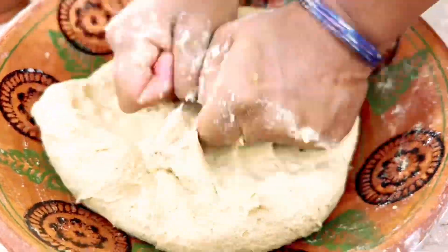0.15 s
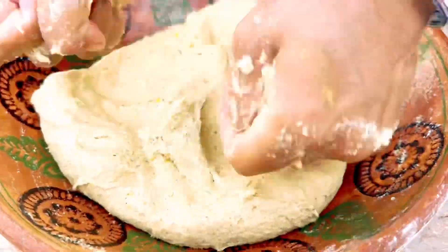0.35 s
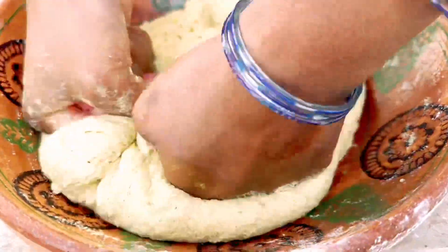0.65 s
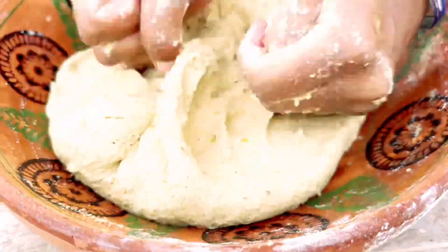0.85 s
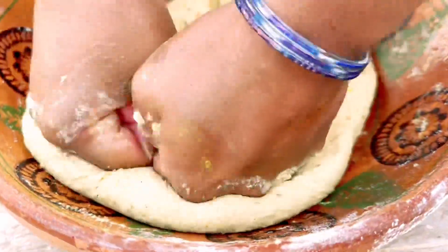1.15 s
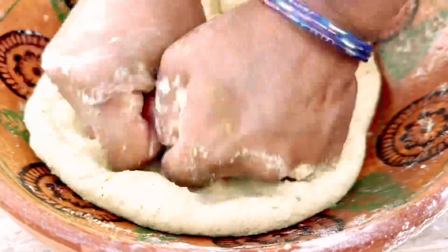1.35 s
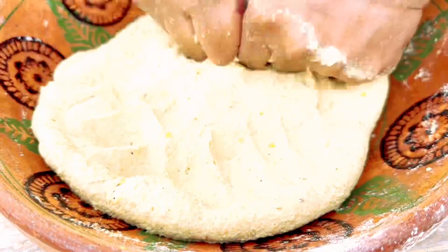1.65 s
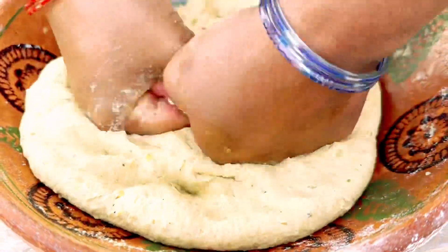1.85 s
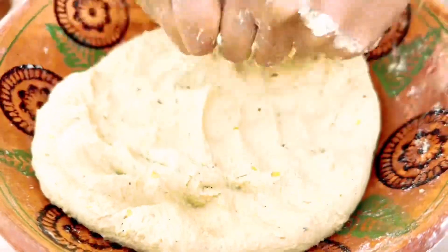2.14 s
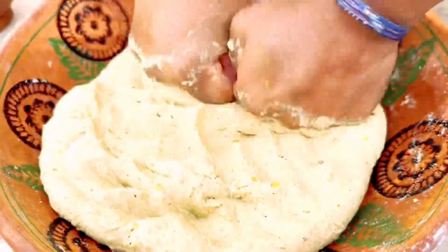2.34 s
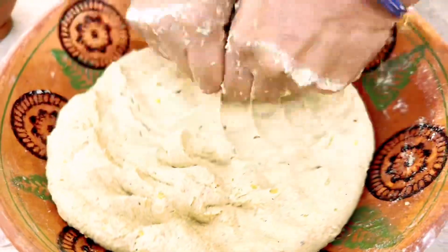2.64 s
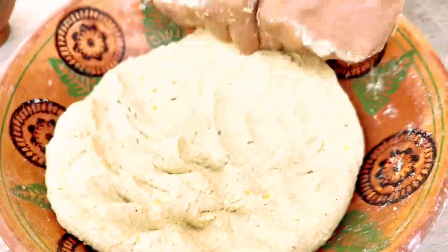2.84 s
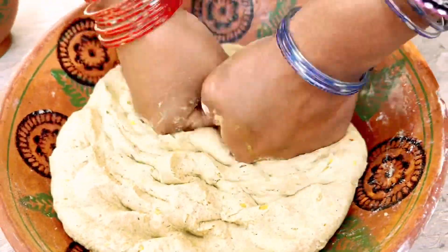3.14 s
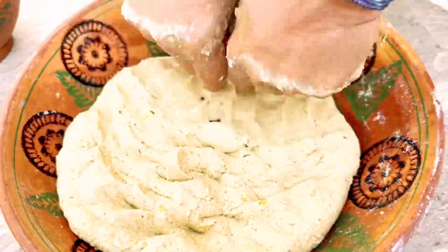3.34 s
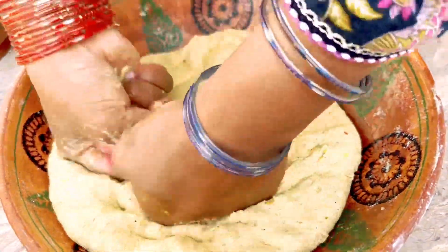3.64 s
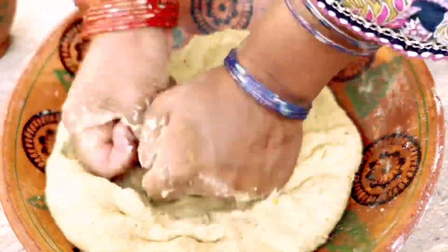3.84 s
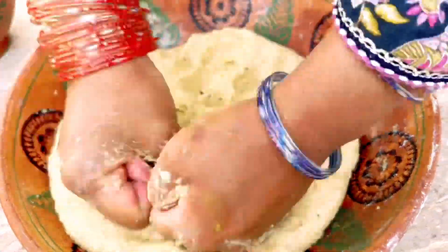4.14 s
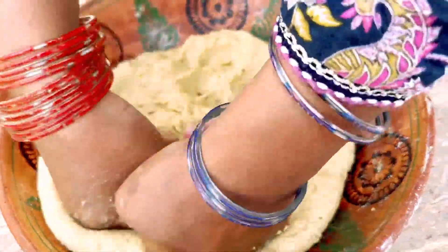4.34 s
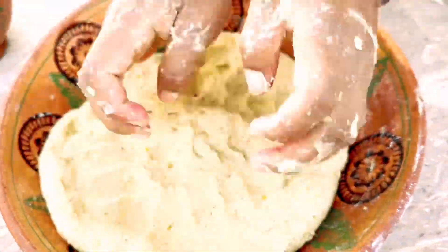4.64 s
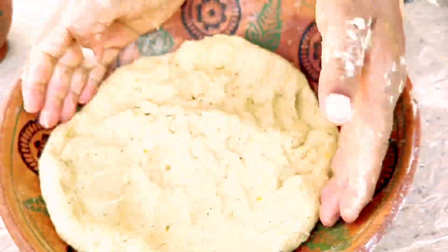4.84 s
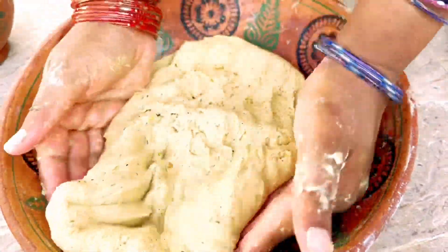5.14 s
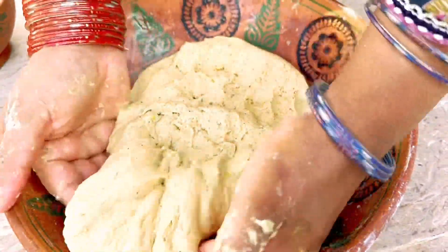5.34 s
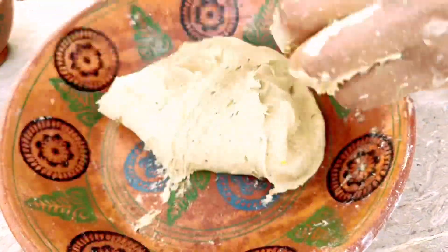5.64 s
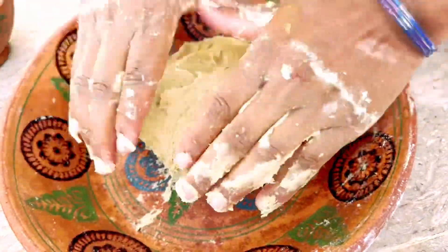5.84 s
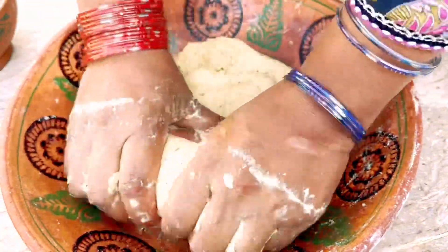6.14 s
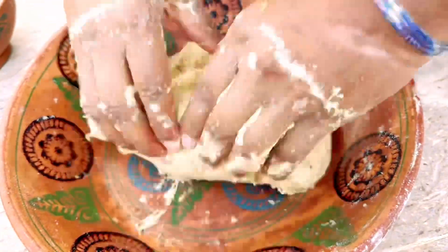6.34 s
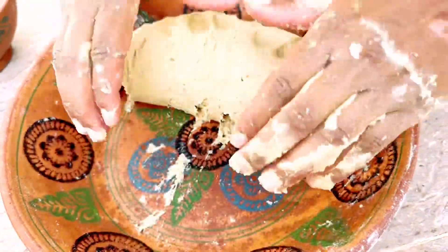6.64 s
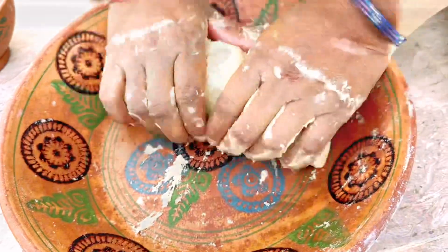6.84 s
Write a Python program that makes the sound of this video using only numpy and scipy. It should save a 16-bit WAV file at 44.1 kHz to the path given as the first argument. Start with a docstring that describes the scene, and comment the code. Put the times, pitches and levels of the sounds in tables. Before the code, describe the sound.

Fists knead stiff dough in a clay bowl, heard close up in an open yard. Glass bangles clink and rattle from the start, high, sharp and irregular, busiest from about 1 to 2.3 seconds. Beneath them, each push gives a soft squelch with sticky ticks and a light rasp, and a short wet pop comes at 1.6 seconds. The bowl rocks and knocks on stone paving with a hard clack at 0.2 and 2 seconds, loudest at 3.2, then more lightly near 3.9 and 4.9. The bangles jingle again around 4 seconds and fall quiet from about 4.6 to 5.7 while dough slides softly over the clay. Near 6 seconds come hollow slaps, light knocks and more clinks, then a scrape, bright clinks at 6.5 and a last knock near 6.9. Soft outdoor air, faint whistles and a far engine's low throb lie behind.

```python
"""Outdoors, on the paving of a yard, two fists knead stiff dough in a clay bowl.
Glass bangles on both wrists collide and ring in their high natural modes. The dough squelches, pops,
ticks and rasps by stick-slip friction, and hard pushes rock the bowl so that it knocks on the stone
and rebounds. Behind are soft open-air noise, faint whistles and a far engine."""
import sys
import numpy as np
from scipy import signal
from scipy.fft import rfft, irfft
from scipy.io import wavfile

SR = 44100
rng = np.random.default_rng(int(sys.argv[2]) if len(sys.argv) > 2 else 0)


def generate_wav(sig):
    """Save sig (samples, or channels by samples) to the path in sys.argv[1] as 16-bit PCM at SR."""
    pcm = np.round(np.clip(np.atleast_2d(sig).T, -1, 1) * 32767).astype(np.int16)
    wavfile.write(sys.argv[1], SR, pcm)


N = 307818

# The bowl strikes the paving. Each row: start in seconds, peak of the main ring in dB, then hollow
# clack, upper ring and treble as offsets from it in dB, and delay of the rebound in seconds.
BOWL_KNOCKS = [(0.2002, -10, -6, -4.5, 1.5, .0078), (2.0285, -9, -7.5, -1.5, 4, .0117),
               (2.254, -24, -9.5, -9, -4, .004), (3.2488, -6, -11, -11, -6.5, .0077),
               (3.9191, -18, -2.5, 3, 5, .004), (4.4348, -38, -14, 4.5, 2, .006),
               (4.8735, -25, -6.5, -3.5, -3.5, .0285), (5.9242, -25, -3, -13, -3, .004),
               (5.9606, -25, -2.5, -6, 12, .017), (6.044, -31.5, -6, -9, 5.5, .005),
               (6.8421, -29, 2, -10, 8, .004), (6.8729, -18.5, -7, -5, 3, 0.016)]
# Natural modes of the clay bowl. Each row: frequency in Hz, level in dB, time to fall 60 dB in seconds.
BOWL_MODES = [(410, -12.5, .1), (596, -24.5, 0.061), (710, -18, 0.022), (975, -1, 0.064),
              (1220, -9.5, 0.019), (1675, -9, 0.13), (1982, -8.5, 0.0056), (2320, -13, 0.05),
              (2516, 1.5, 0.074), (2615, -3, 0.071), (2813, -0.5, 0.025), (3541, -1, 0.055),
              (3800, -14, 0.048), (4900, -23.5, 0.056), (5915, 4.5, 0.035), (6800, -15.5, 0.058),
              (7180, -7, 0.039), (7860, -3, 0.04), (8400, 1.5, 0.023), (9490, 3.5, 0.019),
              (12860, 0, 0.033), (13900, -7, .025), (14450, 6.5, 0.029), (15400, -9, .025)]
# Spectrum of the scraping and the sticky ticks. Each row: frequency in Hz, level in dB.
FRICTION_SPECTRUM = [(300, -23), (1000, -17.5), (1600, -6.5), (2300, -14), (3000, -7.5), (4000, -13),
                     (5500, -12), (7000, -7.5), (9000, 0), (11200, -19), (12500, -4), (13200, -5),
                     (14000, -0.5), (15800, -7.5)]


def amp(db):
    return 10 ** (np.asarray(db) / 20)


def unit_rms(x):
    return x / np.sqrt(np.mean(x ** 2) + 1e-20)


def log_interp(points, hz):
    """Interpolates (Hz, value) points on a log-frequency axis."""
    point_hz, value = np.transpose(points)
    return np.interp(np.log(hz + 1), np.log(point_hz + 1), value)


def freqs(x):
    return np.fft.rfftfreq(x.shape[-1], 1 / SR)


def coloured(x, spectrum):
    """Spectral shaping by (Hz, dB) points, scaled to an rms of 1."""
    return unit_rms(irfft(rfft(x) * amp(log_interp(spectrum, freqs(x))), x.shape[-1]))


def band(x, lo_hz, hi_hz, order=3):
    """Causal Butterworth band-pass."""
    return signal.sosfilt(signal.butter(order, [lo_hz, hi_hz], "band", fs=SR, output="sos"), x)


def wander(rate_hz):
    """Random modulation: low-passed noise with an rms of 1."""
    noise = rng.standard_normal(N)
    return unit_rms(irfft(rfft(noise) * np.exp(-(freqs(noise) / rate_hz) ** 2), N))


def curves(rows):
    """Interpolates each column of a (seconds, ..) table at every sample."""
    times, *columns = np.transpose(rows)
    return [np.interp(np.arange(N) / SR, times, column) for column in columns]


def add(mix, start_s, sound):
    """Superposes a sound on the mix."""
    part = mix[max(round(start_s * SR), 0):][:len(sound)]
    part += sound[:len(part)]


def chatter(t, per_s, settle_s, size):
    """Inelastic impact: a unit impulse, then random rebounds that decay exponentially."""
    hits = size * rng.standard_normal(len(t)) * (rng.random(len(t)) < per_s / SR) * np.exp(-t / settle_s)
    hits[0] = 1
    return hits


def ring(t, hz, db, t60):
    """Free vibration: a sum of damped modes in random phase."""
    phase = 2 * np.pi * rng.random((len(hz), 1))
    decay = amp(db[:, None] - 60 * t / t60[:, None])
    return (decay * np.sin(2 * np.pi * hz[:, None] * t + phase)).sum(0)


def grains(per_s, spread_db):
    """Shot noise: impulses of unequal size at random times."""
    sizes = amp(spread_db * np.minimum(rng.exponential(1, N), 4))
    return sizes * rng.standard_normal(N) * (rng.random(N) < per_s / SR)


def open_air(level_db=-51, swell_hz=750, swell_octaves=1.46):
    """Ambient noise, partly coherent between left and right, whose middle range swells and sinks."""
    # Each row: frequency in Hz, level in dB.
    spectrum = [(20, -21.5), (40, -11), (70, -2.5), (150, -0.5), (250, -7.5), (500, -16.5), (1000, -23.5),
                (2000, -23), (4000, -28.5), (6500, -30), (9000, -24.5), (11200, -47.5), (12500, -47),
                (14000, -27), (16000, -50)]
    # Each row: time in seconds, gain of the middle range in dB.
    swells = [(0, 4.5), (1.6, 9.5), (3.1, -0.5), (5.6, 0.5), (6.2, 5), (6.98, 4)]
    # Each row: frequency in Hz, left-right coherence from 0 to 1.
    coherences = [(60, 0.7), (130, 0.95), (290, 0.79), (640, 0.42), (1400, 0.079), (3100, .5), (7000, 0.62),
                  (15000, .7)]
    left, independent = rng.standard_normal((2, N))
    hz = freqs(left)
    coherence = log_interp(coherences, hz)
    right = irfft(coherence * rfft(left) + np.sqrt(1 - coherence ** 2) * rfft(independent), N)
    air = amp(level_db) * coloured(np.array([left, right]), spectrum)
    middle = irfft(rfft(air) * np.exp(-(np.log2((hz + 1) / swell_hz) / swell_octaves) ** 2), N)
    drift = amp(1.5 * wander(5))
    swell = amp(curves(swells)[0] + 1.3 * wander(9.7))
    return drift * air + middle * (swell - 1)


def whistles(edge_ratio=1.092):
    """Narrow-band noise is heard as a pitch: faint, distant whistles that fade in and out."""
    # Each row: midpoint in seconds, length in seconds, centre frequency in Hz, level in dB.
    swells = [(0.062, 0.36, 4080, -59), (0.547, 0.56, 1690, -63.5), (1.196, 1.4, 478, -56),
              (1.408, 1.6, 830, -63), (1.8, 0.5, 1674, -56.5), (2.446, 0.27, 2740, -58),
              (3.637, 0.48, 1520, -59), (4.26, 0.43, 1890, -60), (5.844, 0.26, 1620, -57)]
    t, out = np.arange(N) / SR, np.zeros((2, N))
    for middle_s, length_s, hz, db in swells:
        swell = np.cos(np.pi * np.clip((t - middle_s) / length_s, -.5, .5))
        noise = band(rng.standard_normal((2, N)), hz / edge_ratio, hz * edge_ratio, order=2)
        out += amp(db) * swell * unit_rms(noise)
    return out


def engine(drone_hz=94, drone_db=-42, upper_hz=122):
    """Only a far engine's low throb arrives: three tones, randomly modulated in pitch and level."""
    # The lowest tone. Each row: time in seconds, pitch in Hz, relative level in dB.
    hum_track = [(0, 47.5, -44), (.72, 51.9, -35), (1.7, 55.5, -38), (2.3, 57.5, -41.5), (3.6, 55.5, -40.5),
                 (5.3, 53, -41.5), (5.9, 50, -42.5), (6.98, 56, -40.5)]
    # The highest tone. Each row: time in seconds, relative level in dB.
    upper_track = [(0, -51.5), (5.55, -51), (5.85, -38), (6.65, -38), (6.98, -51)]
    def tone(hz, db, blur_hz, flutter_db):
        cycles = np.cumsum(hz + blur_hz * wander(13.86)) / SR
        return amp(db) * unit_rms(amp(flutter_db * wander(12)) * np.sin(2 * np.pi * cycles))
    hum_hz, hum_db = curves(hum_track)
    hum = tone(hum_hz, hum_db - 1, blur_hz=2.5, flutter_db=3.5)
    drone = tone(drone_hz, drone_db, blur_hz=8, flutter_db=3.66)
    upper = tone(upper_hz, curves(upper_track)[0] - 3, blur_hz=13, flutter_db=3.5)
    return hum + drone + upper


def hushed(x, depth_db=-8, above_hz=3000):
    """A time-varying shelf filter: the treble dips briefly between strokes."""
    # Each row: midpoint in seconds, length in seconds.
    lulls = [(1.298, 0.078), (2.733, 0.48), (3.475, .08), (3.702, 0.18), (4.318, 0.055), (4.714, 0.41),
             (5.69, .16), (6.752, 0.22)]
    t = np.arange(N) / SR
    dip = sum(np.cos(np.pi * np.clip((t - middle_s) / length_s, -.5, .5)) for middle_s, length_s in lulls)
    treble = irfft(rfft(x) * (1 - np.exp(-(freqs(x) / above_hz) ** 2)), N)
    return x + treble * (amp(depth_db * dip) - 1)


def yard(x):
    """Early reflections from bowl, arms and ground, and faint, dull reverberation from the walls."""
    t = np.arange(SR // 2) / SR
    def echoes(db, t60):
        taps = rng.standard_normal((2, len(t))) * (rng.random((2, len(t))) < .1)
        taps *= amp(-60 * t / t60) * (t > .001)
        return amp(db) * taps / np.linalg.norm(taps, axis=1, keepdims=True)
    early = echoes(db=-7, t60=0.047)
    late = band(echoes(db=-22, t60=0.73), 200, 9100, order=1)
    return x + signal.fftconvolve(x[None], early + late, axes=1)[:, :N]


def faint_ticks(level_db=-41, decay_s=0.0018):
    """Unpitched transients: sparse, tiny, sticky ticks of the dough."""
    t = np.arange(SR // 50) / SR
    tick = coloured(rng.standard_normal(len(t)), FRICTION_SPECTRUM) * np.exp(-t / decay_s)
    impulses = grains(per_s=8, spread_db=3.5)
    return amp(level_db) * signal.fftconvolve(impulses, tick / abs(tick).max())[:N]


def pops_and_slaps(smack=0.26):
    """Damped oscillations with noise: short wet pops of dough, and hollow slaps as the bowl knocks."""
    # Each row: start in seconds, level in dB, frequency in Hz, time to fall 60 dB in seconds.
    events = [(1.222, -36, 2520, 0.0092), (1.625, -21, 656, 0.01), (1.626, -28, 1620, 0.011),
              (2.808, -42, 436, .05), (3.831, -36.5, 223, 0.085), (5.633, -33, 1223, 0.025),
              (5.923, -23, 830, 0.037), (5.964, -16, 1155, 0.018)]
    out, t = np.zeros(N), np.arange(SR // 10) / SR
    for start_s, db, hz, t60 in events:
        wet = unit_rms(band(rng.standard_normal(len(t)), hz / 2, hz * 2, order=2))
        add(out, start_s, amp(db - 60 * t / t60) * (np.sin(2 * np.pi * hz * t) + smack * wet))
    return out


def kneading(release_s=0.075, relax_s=.3, relax_db=-16, drag_skew=1.09, drag_wet_db=-20.5):
    """Dough squelches as it deforms, while grit and sliding glass rasp by stick-slip friction."""
    # A fist sinks in. Each row: time of most force in seconds, time to rise 20 dB in seconds,
    # relative level in dB, offset of the squelch in dB.
    pushes = [(.141, 0.038, -28, -12.5), (.23, 0.023, -31, -16), (.743, 0.041, -29.5, -13),
              (.846, 0.1, -41, -4), (1.045, 0.021, -35, -11.5), (1.373, 0.054, -26.5, -16),
              (1.5, 0.039, -37, -17), (1.988, 0.055, -26, -14.5), (2.606, 0.081, -30.5, -14),
              (2.864, 0.087, -41.5, -18), (3.23, 0.054, -29.5, -11), (3.834, 0.017, -26, -12),
              (4.444, 0.024, -29.5, -11), (4.895, 0.046, -47, 7), (6.03, .14, -34.5, -12.5)]
    # Dough slides over clay. Each row: start in seconds, length in seconds, relative level in dB.
    drags = [(2.243, 0.27, -47.5), (4.056, 0.24, -43), (5.268, 0.31, -43.5), (6.21, 0.28, -36.5)]
    # Each row: frequency in Hz, level in dB.
    squelch_spectrum = [(120, -16), (220, -7.5), (420, -2), (650, 3), (1000, -11), (1600, -5.5),
                        (2500, -25), (5000, -38)]
    t, wet_power, scrape_power = np.arange(N) / SR, np.zeros(N), np.zeros(N)
    for peak_s, rise_s, db, wet_db in pushes:
        before, after = np.maximum(peak_s - t, 0), np.maximum(t - peak_s, 0)
        # the force falls quickly, then the dough slowly relaxes
        fall = amp(-20 * after / release_s) ** 2 + amp(relax_db - 20 * after / relax_s) ** 2
        power = amp(db - 20 * before / rise_s) ** 2 * fall
        scrape_power += power
        wet_power += power * amp(wet_db) ** 2
    for start_s, length_s, db in drags:
        progress = np.clip((t - start_s) / length_s, 0, 1)
        power = amp(db) ** 2 * np.sin(np.pi * progress ** drag_skew) ** 2
        scrape_power += power
        wet_power += power * amp(drag_wet_db) ** 2
    judder = amp(2 * wander(70))
    squelch = amp(2) * coloured(grains(per_s=700, spread_db=4.6), squelch_spectrum)
    # dough tears from the skin in tiny snaps
    snaps = amp(-6) * unit_rms(band(grains(per_s=420, spread_db=2), 660, 4900, order=2))
    scrape = amp(-2) * coloured(grains(per_s=3000, spread_db=1.2), FRICTION_SPECTRUM)
    return judder * (np.sqrt(wet_power) * (squelch + snaps) + np.sqrt(scrape_power) * scrape)


def bowl_settling(delay_s=.04, level_db=-44, medium_knock_db=-19):
    """Repeated excitation: after each knock, soft taps of the foot keep the bowl's main ring going."""
    out, t = np.zeros(N), np.arange(SR // 3) / SR
    for start_s, knock_db, *_ in BOWL_KNOCKS:
        taps = chatter(t, per_s=170, settle_s=0.084, size=1)
        clay = ring(t, *np.transpose(BOWL_MODES))
        ringing = band(signal.fftconvolve(taps, clay), 2400, 3500, order=1)
        peak_db = level_db + 0.24 * (knock_db - medium_knock_db)
        add(out, start_s + delay_s, amp(peak_db) * ringing / abs(ringing).max())
    return out


def bowl_knocks(detune=0.0055, uneven_db=4, crack_s=0.004, settle_s=.0036, rebound_db=-5):
    """Impact on stone gives a gritty crack and excites the clay's modes, which the dough damps."""
    out, t = np.zeros(N), np.arange(SR // 3) / SR
    hz, db, t60 = np.transpose(BOWL_MODES)
    bands_hz = [(300, 720), (720, 1500), (1500, 3100), (3100, 4400), (4400, 19000)]
    for start_s, peak_db, clack_db, upper_db, treble_db, rebound_s in BOWL_KNOCKS:
        for after_s, gain_db in [(0, 0), (rebound_s, rebound_db)]:
            struck_hz = hz * (1 + detune * rng.standard_normal(len(hz)))
            clay = ring(t, struck_hz, db + uneven_db * rng.standard_normal(len(hz)), t60)
            crack = amp(5) * band(rng.standard_normal(len(t)), 1000, 20000, order=2) * np.exp(-t / crack_s)
            ringing = signal.fftconvolve(chatter(t, 1400, settle_s, size=0.37), clay)
            grit = signal.fftconvolve(chatter(t, 1400, settle_s, size=0.5), crack)
            impact = (ringing + grit)[:len(t)]
            belly, body, main, upper, treble = (unit_rms(band(impact, *edges)) for edges in bands_hz)
            clack = amp(-4.5) * belly + amp(1.5) * body
            knock = main + amp(clack_db) * clack + amp(upper_db + 1) * upper + amp(treble_db + 1) * treble
            add(out, start_s + after_s, amp(peak_db + gain_db) * knock / abs(main).max())
    return out


def jiggles(per_s=40, spread_db=3, ring_s=.045):
    """Light, irregular collisions of loose bangles as the arms move, as rows for bangles()."""
    # Each row: start in seconds, length in seconds, relative level in dB.
    arm_moves = [(0.331, .2, -30.5), (0.703, .26, -31.5), (1.055, .1, -28.5), (1.353, .09, -21),
                 (2.114, .17, -26), (2.804, .07, -34), (3.489, .06, -31), (4.089, .18, -23.5),
                 (5.988, .05, -22), (6.089, .05, -21), (6.86, .13, -29.5)]
    rows = []
    for start_s, length_s, db in arm_moves:
        delays_s = (np.arange(16) + rng.random(16)) / per_s
        levels_db = db + spread_db * rng.standard_normal(16)
        rows += [(start_s + s, level, ring_s) for s, level in zip(delays_s, levels_db) if s < length_s]
    return rows


def bangles(count=6, stack_spread=.014, uneven_db=4.5, settle_s=.007, click_s=0.0005, graze_s=0.0061):
    """Collisions excite the modes of slightly unlike glass rings; hard ones rattle longer and brighter."""
    # A wrist jerks. Each row: time in seconds, relative level in dB, nominal ring time in seconds.
    clashes = [(0.126, -18.5, 0.095), (0.1976, -12.5, 0.034), (0.273, -17, 0.055), (0.4744, -18, 0.0083),
               (0.8062, -21.5, 0.011), (1.0219, -16, 0.073), (1.0354, -15, 0.058), (1.05, -13, 0.042),
               (1.0668, -12.5, 0.022), (1.341, -17, 0.093), (1.398, -7.5, 0.028), (1.4721, -12, 0.033),
               (1.6505, -9, .04), (1.727, -13, .06), (1.9557, -14.5, .04), (2.01, -12, .08),
               (2.101, -15, .06), (2.1153, -12.5, 0.094), (2.2912, -10, .07), (2.307, -15.5, 0.1),
               (2.597, -17.5, 0.13), (2.8684, -15.5, 0.019), (3.1952, -19.5, 0.075), (3.216, -23, 0.28),
               (3.298, -21, 0.057), (4.0228, -23, 0.023), (4.054, -16.5, 0.024), (4.0859, -12, 0.11),
               (4.1355, -20, 0.13), (4.1779, -19, 0.095), (4.5, -18.5, 0.086), (5.7674, -11, 0.12),
               (5.8316, -17.5, 0.056), (5.856, -15.5, .06), (6.0795, -17.5, 0.034), (6.1221, -17.5, 0.064),
               (6.5091, -11, 0.081), (6.5948, -9.5, 0.029), (6.6138, -8.5, 0.087), (6.841, -11.5, 0.05),
               (6.942, -19.5, .04)]
    # Each row: frequency in Hz, level in dB, spread from bangle to bangle in Hz.
    glass_modes = [(4030, -20, 380), (4586, -14.5, 230), (4950, -18, 250), (6170, -22, 350),
                   (7374, -9.5, 180), (7900, -7, 250), (8560, -2.5, 130), (9037, 3, 41), (9730, 1, 130),
                   (12550, -3.5, 78), (13900, -19, 38), (14040, -5, 120), (14000, -5, 67),
                   (14160, -0.5, 240), (14300, 1.5, 160), (15980, -8.5, 100), (15800, -4.5, 79)]
    out, t = np.zeros(N), np.arange(SR // 9) / SR
    hz, db, spread_hz = np.transpose(glass_modes)
    lead = SR // 60  # samples of grazing ahead of the collision
    for time_s, level_db, ring_s in clashes + jiggles():
        hardness_db = level_db + 10.5
        rattle_s = settle_s * amp(.45 * hardness_db)
        t60 = np.full(len(hz), 0.77 * max(ring_s, .01))
        # each time another part of the stack is struck
        stack_hz = hz * (1 + stack_spread * rng.standard_normal(len(hz)))
        rattle = np.zeros(len(t))
        for k in range(count):
            detune, strike_spot = rng.standard_normal((2, len(hz)))
            glass = ring(t, stack_hz + spread_hz * detune, db + uneven_db * strike_spot, t60)
            click = amp(-1) * rng.standard_normal(len(t)) * np.exp(-t / click_s)
            # the rings graze as they slide together, then collide and rebound
            graze = amp(-17) * chatter(t[:lead], 2500, graze_s, size=0.59)[::-1]
            contacts = np.concatenate([graze, chatter(t, 700, rattle_s, size=0.64)])
            delay_s = k * rattle_s * 0.2 * rng.random()  # the blow passes along the stack
            add(rattle, delay_s, signal.fftconvolve(contacts, glass + click)[:len(t)])
        top = unit_rms(band(rattle, 11500, 19000))
        lower = unit_rms(band(rattle, 3600, 10800))
        clink = top + amp(-5 - 0.079 * hardness_db) * lower
        add(out, time_s - lead / SR, amp(level_db - 1) * clink / abs(top).max())
    return out


def scene():
    """Superposition of the work at the bowl, its reflections and the distant background."""
    work = bangles() + faint_ticks() + bowl_knocks() + bowl_settling()
    work += hushed(kneading()) + pops_and_slaps()
    return yard(work) + engine() + hushed(open_air()) + whistles()


def record(dry, cutoff_hz=15950):
    """Phase and level differences between two microphone ports, then clipping and a low-pass."""
    # Each row: frequency in Hz, phase lead of the left in radians, left over right in dB.
    ports = [(20, 0, -0.5), (400, 0.74, -0.5), (995, 0.9, 3.5), (1430, 2.5, -2.5), (1960, 5, -1.5),
             (2550, 6.5, 0.5), (3340, 8, 0.5), (4000, 7, 1), (4600, 7, 3), (5970, 8, 5.5), (7750, 7.5, 6.5),
             (8160, 7.5, 2), (9200, 5.5, 0), (11140, 3.5, 1), (11900, 2.5, -1), (12850, 1, 1),
             (15000, -1.6, 0)]
    port_hz, lead, left_db = np.transpose(ports)
    hz = freqs(dry)
    left_gain = amp(np.interp(hz, port_hz, left_db) / 2) * np.exp(.5j * np.interp(hz, port_hz, lead))
    pair = irfft(rfft(dry) * np.array([left_gain, 1 / left_gain]), N)
    lowpass = signal.firwin(301, cutoff_hz, window=("kaiser", 7), fs=SR)
    return signal.oaconvolve(np.clip(pair, -1, 1), lowpass[None], "same")


dry = scene()
out = record(dry)
generate_wav(out)
```